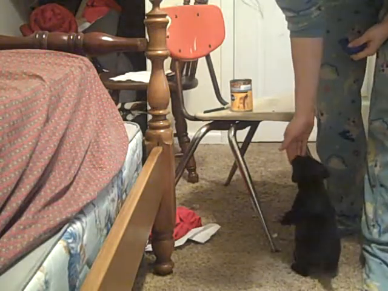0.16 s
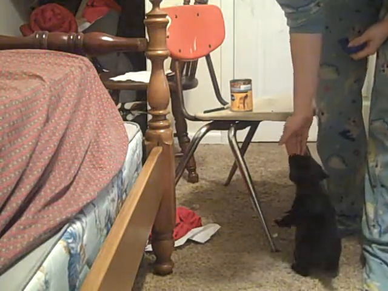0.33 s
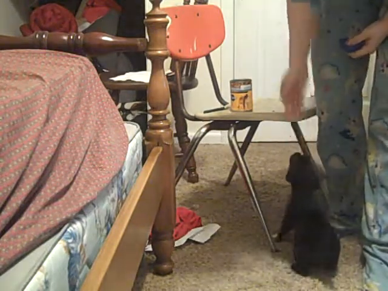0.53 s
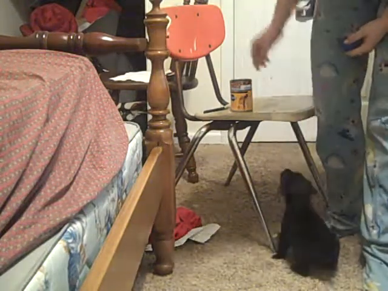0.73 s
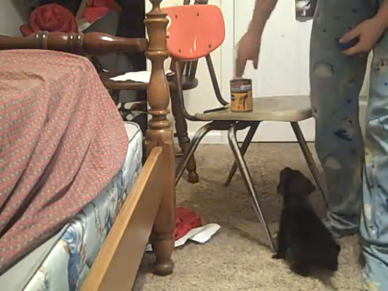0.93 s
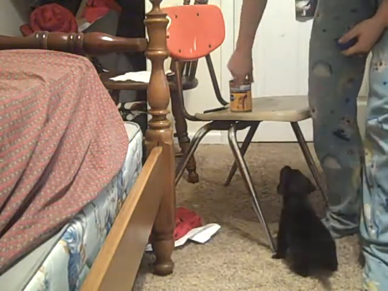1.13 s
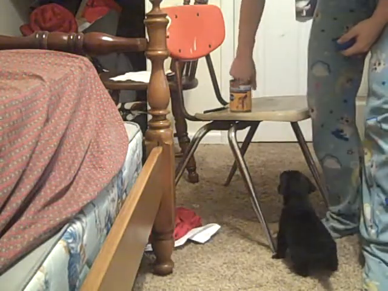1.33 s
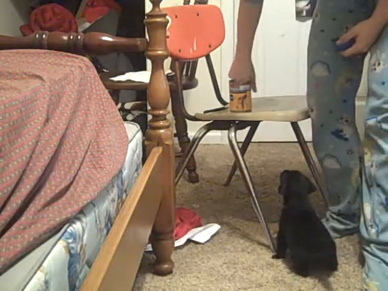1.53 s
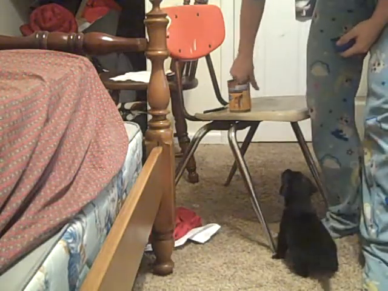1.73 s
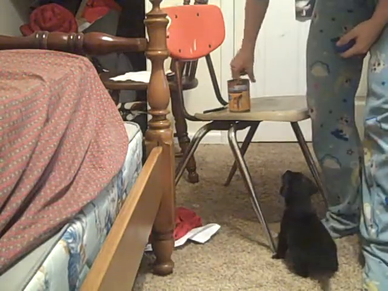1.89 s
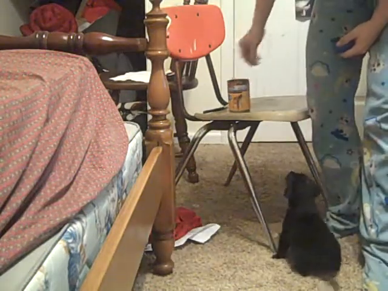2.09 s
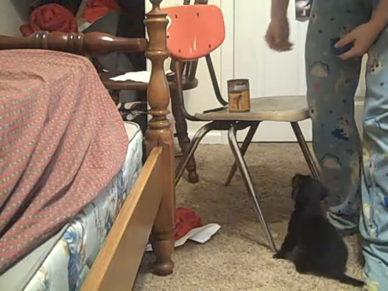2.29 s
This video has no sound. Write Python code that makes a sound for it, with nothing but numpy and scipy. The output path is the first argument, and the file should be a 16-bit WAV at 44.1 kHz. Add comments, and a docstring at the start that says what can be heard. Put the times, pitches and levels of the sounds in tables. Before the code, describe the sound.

A handheld training clicker gives a loud bright snap and a softer, duller release a tenth of a second later in a small carpeted bedroom; then faint rummaging in a treat can and a light knock, over quiet hiss.

```python
"""In a small carpeted bedroom, a training clicker snaps when pressed and springs back 0.1 s later.
Each snap is a burst of room-scattered noise, with a cluster of reflections and damped case and tongue modes.
A faint bright hiss swells in the release's tail; a hand then rummages in a treat can on a chair (noise swells
and short ticks) and knocks it lightly on the way out (a softer snap with can modes). Throughout lie room
noise, hiss and a thin high whine; automatic gain control ducks at the clicks, holds, and recovers slowly."""
import sys
import numpy as np
from scipy import signal
from scipy.fft import rfft, irfft, next_fast_len
from scipy.io import wavfile
from scipy.ndimage import uniform_filter1d, minimum_filter1d, map_coordinates

SR = 44100
rng = np.random.default_rng(int(sys.argv[2]) if len(sys.argv) > 2 else 0)


def waveform_to_disk(signal):
    """Save audio, clipped to [-1, 1], as 16-bit WAV at the path in sys.argv[1]."""
    frames = np.transpose(np.atleast_2d(signal))
    scaled = np.clip(frames, -1, 1) * 32767
    samples = np.round(scaled).astype(np.int16)
    wavfile.write(sys.argv[1], SR, samples)


N = 103635


def amp(db):
    """Level law: decibels to amplitude gain."""
    return 10 ** (np.asarray(db) / 20)


def unit(x):
    """Normalisation: scale a signal to rms 1."""
    return x / np.sqrt(np.mean(x ** 2) + 1e-20)


def along(points, hz):
    """Interpolation of (Hz, value) points along a logarithmic frequency axis."""
    point_hz, values = np.transpose(points)
    return np.interp(np.log(hz + 1), np.log(point_hz + 1), values)


def filtered(x, response):
    """Linear filtering: the spectrum of x times a response of frequency."""
    size = next_fast_len(len(x) + 8192)
    spectrum = rfft(x, size) * response(np.fft.rfftfreq(size, 1 / SR))
    return irfft(spectrum, size)[:len(x)]


def noise(colour, size, tilt_db=0):
    """Spectral shaping of white noise, to rms 1; the tilt nears tilt_db per octave well above 500 Hz."""
    def response(hz):
        return amp(along(colour, hz) + tilt_db * np.log2(1 + hz / 500))
    return unit(filtered(rng.standard_normal(size), response))


def wobble(rate):
    """Slow random modulation: a smooth curve through `rate` random knots per second."""
    knots = rng.standard_normal(int(N * rate / SR) + 4)
    return map_coordinates(knots, [np.arange(N) * rate / SR])


def at(s, x):
    """Superposition in time: place a sound at s seconds."""
    return np.pad(x, (max(round(s * SR), 0), N))[:N]


def clicker():
    """Snap-through of a tongue: a bright press, then a duller release that stirs the middle modes."""
    # Colour of each snap and of its reflections. Each row: frequency in Hz, relative level in dB per Hz.
    press_colour = [(150, -45.5), (220, -20), (300, -9.5), (550, -0.5), (750, -5.5), (1000, 1), (1600, 0.5),
                    (2800, -5.5), (4700, -9), (6000, -6.5), (9000, -7), (12000, -16.5), (15800, -26)]
    release_colour = [(180, -48), (300, -23), (500, -13), (950, -0.5), (1250, -5.5), (2100, 3),
                      (3200, -4.5), (4200, -7.5), (5200, -19), (9000, -23), (15000, -35)]
    press_slap_colour = [(30, -13.5), (170, -6.5), (250, -12), (500, -2.5), (1500, -3.5), (2600, -3.5),
                         (4500, -18), (15000, -31)]
    release_slap_colour = [(200, -30), (1200, -5), (2100, -7), (3200, -3), (4200, -1), (6000, -28),
                           (15000, -45)]
    # Modes of the plastic case and steel tongue. Each row: frequency in Hz, relative level in dB when
    # pressed, relative level in dB when released, T60 in seconds.
    clicker_modes = [(170, -14, -45, 0.059), (320, -21, -26.5, 0.16), (565.5, -2, -16, 0.11),
                     (592, -19.5, -16.5, 0.39), (919, -11, -10, .14), (975.3, .5, -13.5, 0.14),
                     (1143, -9.5, -16, .15), (1455.4, -6.5, -16, 0.14), (1642, -2, -13, 0.12),
                     (2026, -14.5, -12, .11), (2150, -18, 1, .1), (2697, -13.5, 0, 0.079),
                     (3163, -26.5, 0, .08), (3320, -13, -16, .13), (7397, -8.5, -35, 0.081),
                     (9230, -11, -30, .09)]
    pressed = [(hz, db, t60) for hz, db, _, t60 in clicker_modes]
    released = [(hz, db, t60) for hz, _, db, t60 in clicker_modes]
    # reflections: delay in seconds, level in dB relative to the snap, T60 in seconds
    press_slap, release_slap = (.0075, -4.5, .073), (.008, 1, .034)
    press = click(.2422, press_colour, press_slap_colour, press_slap, pressed, ring_db=1)
    release = click(.3432, release_colour, release_slap_colour, release_slap, released, ring_db=1.5)
    press_db, release_db = -13.5, -28
    return thump() + amp(press_db) * press + amp(release_db) * release


def click(s, colour, slap_colour, reflection, modes, ring_db):
    """Impact response: the snap of the tongue, the answer of the walls and the ring of the case."""
    ring_delay_s = .005
    blow = at(s, snap(colour)) + slap(s, slap_colour, reflection)
    return blow + amp(ring_db) * at(s + ring_delay_s, ring(modes))


def thump():
    """Low-frequency pressure pulse: the small push of the press, its spectrum peaking at 55 Hz."""
    u = 2 * np.pi * 55 * np.arange(SR // 8) / SR
    return amp(-27.5) * at(.2535, (1 - u) * np.exp(-u))


def snap(colour, tilt_db=0, decay_share=1):
    """Reverberant decay of an impulse: dense noise at once, dying band by band, early then late."""
    # Decay of the bedroom: a quick early fall, then a faint tail. Each row: frequency in Hz, T60 in
    # seconds before decay_share scales it.
    early_t60 = [(100, .07), (400, 0.16), (1000, .15), (3000, .15), (8000, 0.16), (15000, .12)]
    late_t60 = [(100, 0.5), (400, 0.73), (1000, 0.38), (3000, 0.28), (8000, .26), (15000, .22)]
    late_db, hold_s = -14, .01
    hz, t, bands = signal.stft(noise(colour, SR // 2, tilt_db), SR, nperseg=256)
    t = np.maximum(t - hold_s, 0) / decay_share

    def fall(t60):
        return amp(-60 * t / along(t60, hz)[:, None])

    decay = np.hypot(fall(early_t60), amp(late_db) * fall(late_t60))
    burst = signal.istft(bands * decay, SR, nperseg=256)[1]
    # the snap and its tail are high-passed at 233 Hz
    return signal.sosfilt(signal.butter(2, 233, "highpass", fs=SR, output="sos"), burst)


def slap(s, colour, reflection):
    """Early reflection: a short decaying cluster of echoes just after a blow at s seconds."""
    delay_s, db, t60 = reflection
    t = np.arange(SR // 4) / SR
    return at(s + delay_s, amp(db - 60 * t / t60) * noise(colour, len(t)))


def ring(modes):
    """Modal vibration: damped sines of random phase that swell just after the blow."""
    rise_s = .003
    t = np.arange(SR // 2) / SR
    tones = np.zeros(len(t))
    for hz, db, t60 in modes:
        decay = amp(db + rng.normal(0, 1) - 60 * t / t60)  # random level, 1 dB standard deviation
        tones += decay * np.sin(2 * np.pi * (hz * t + rng.random()))
    return tones * (1 - np.exp(-t / rise_s))


def treat_can():
    """Superposition of sources: swells of rubbing noise, small ticks and a knock on the can."""
    return rubbing() + ticks() + can_knock()


def rubbing():
    """Amplitude modulation of noise: bell-shaped swells of rubbing noise with random flutter."""
    # Swells of rubbing noise; the first is a faint bright hiss in the release's tail. Each row: centre in
    # seconds, half length in seconds, level in dB.
    swells = [(0.463, 0.036, -67), (1.25, 0.075, -71), (1.37, 0.049, -73.5), (1.6, 0.25, -77),
              (2.09, 0.043, -74)]
    # Colour of the noise. Each row: frequency in Hz, relative level in dB per Hz.
    rubbing_colour = [(200, -3), (1500, -4), (4000, -2), (6500, -4), (10000, 0), (15000, -10.5)]
    t = np.arange(N) / SR
    envelope = sum(amp(db) * np.exp(-((t - s) / half) ** 2 / 2) for s, half, db in swells)
    flutter = amp(1.3 * wobble(59.85))
    return envelope * flutter * noise(rubbing_colour, N)


def ticks():
    """Impulsive contact: small handling noises and treats tick, each with its own spectral tilt."""
    # Contacts. Each row: start in seconds, level in dB, tilt in dB per octave (approached above 500 Hz).
    contacts = [(.428, -56.5, -3.5), (.466, -58, -7.5), (.614, -69.5, 5), (.675, -70, -5),
                (.885, -66.5, -5.5), (0.956, -70.5, -7.5), (1.235, -65.5, -14), (1.468, -67.5, -7),
                (1.5234, -64.5, -1), (1.6243, -63.5, -2), (1.645, -66, -10), (1.726, -68, 7),
                (1.74, -67.5, -9), (1.845, -67.5, -7), (1.93, -68.5, 1.5), (2.028, -63, -2),
                (2.068, -65.5, 15), (2.334, -61.5, -2)]
    # Colour before the tilt. Each row: frequency in Hz, relative level in dB per Hz.
    tick_colour = [(150, -44), (300, -7.5), (700, -2.5), (980, 5.5), (1250, -0.5), (3000, -2), (9000, -9),
                   (15000, -20)]
    return sum(amp(db) * at(s, snap(tick_colour, tilt_db)) for s, db, tilt_db in contacts)


def can_knock():
    """Soft impact on a resonator: a knock that fades sooner than a snap, and the ring of the can."""
    # Colour of the knock and of its reflections. Each row: frequency in Hz, relative level in dB per Hz.
    knock_colour = [(100, -28), (350, -25), (600, -4), (900, 4.5), (1300, 4), (2800, -1), (3400, -16),
                    (4200, -10), (6000, -33), (15000, -36)]
    knock_slap_colour = [(150, -43), (500, -13), (900, 4), (1500, -6), (3000, -16), (8000, -37)]
    # Modes of the can. Each row: frequency in Hz, relative level in dB, T60 in seconds.
    can_modes = [(884, 3, 0.033), (985, 2.5, 0.032), (1473, -5.5, .07), (2034, -3, 0.079)]
    knock_s, knock_db = 2.0392, -49
    can_ring_db, can_delay_s = -40.5, .007
    # reflections: delay in seconds, level in dB relative to the knock, T60 in seconds
    knock_slap = (.0075, 2.6, .024)
    blow = at(knock_s, snap(knock_colour, decay_share=0.93)) + slap(knock_s, knock_slap_colour, knock_slap)
    can_ring = at(knock_s + can_delay_s, ring(can_modes))
    return amp(knock_db) * blow + amp(can_ring_db) * can_ring


def room_noise():
    """Stationary coloured noise: room noise and hiss whose level drifts slightly."""
    # Colour of the noise floor. Each row: frequency in Hz, relative level in dB per Hz.
    floor_colour = [(20, -1.5), (45, -11.5), (90, -16.5), (195, -18.5), (245, -8.5), (370, -11),
                    (430, -14.5), (1000, -17), (1600, -16), (2300, -21), (4000, -26), (8000, -31),
                    (15000, -34)]
    return amp(-65 + .5 * wobble(9.7)) * noise(floor_colour, N)


def whine():
    """Superposition of sines: a steady thin high whine with a slight level flutter."""
    whine_hz, spacing_hz, side_db = 15736, 13.5, -13
    level_db, waver_db = -68.5, 1
    t = np.arange(N) / SR
    tone = np.sin(2 * np.pi * whine_hz * t)
    side_tone = amp(side_db) * np.sin(2 * np.pi * (whine_hz - spacing_hz) * t)
    return amp(level_db + waver_db * wobble(40)) * unit(tone + side_tone)


def scene():
    """Superposition of all sources at one microphone."""
    return (clicker() + treat_can() + (room_noise() + whine()))[None]


def record(dry):
    """Dynamic range compression: gain ducks at once, holds and recovers slowly; then a band limit."""
    threshold_db, slope = -28.5, 0.26  # slope: dB of cut per dB above threshold
    recover_db_per_s, hold_s = 12, 0.28
    top_hz = 15900
    x, t = dry[0], np.arange(N) / SR
    level_db = 10 * np.log10(np.abs(uniform_filter1d(x * x, size=128)) + 1e-12)
    need_db = slope * np.maximum(level_db - threshold_db, 0)
    # hold the largest cut called for over the last hold_s
    half = int(hold_s * SR / 2)
    held_db = -minimum_filter1d(-need_db, 2 * half + 1, origin=half, mode="constant")
    # let the cut shrink no faster than the recovery rate
    recovery_db = recover_db_per_s * t
    cut_db = np.maximum.accumulate(held_db + recovery_db) - recovery_db

    def band_limit(hz):
        return 1 / (1 + (hz / top_hz) ** 200)

    return filtered(x * amp(-cut_db), band_limit)[None]


dry = scene()
out = record(dry)
waveform_to_disk(out)
```